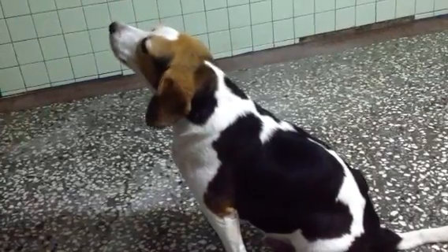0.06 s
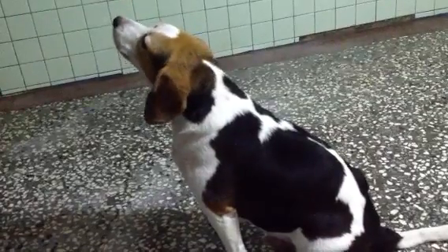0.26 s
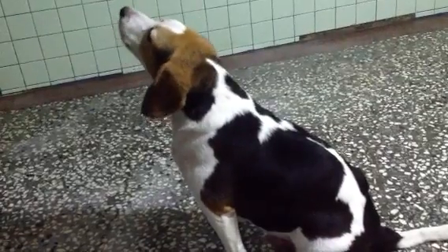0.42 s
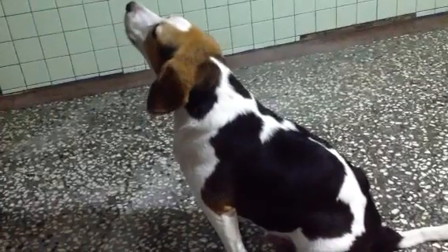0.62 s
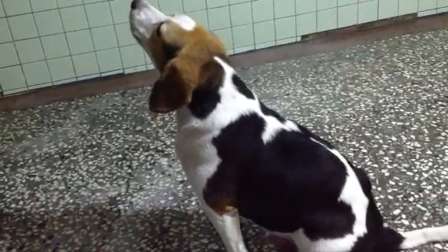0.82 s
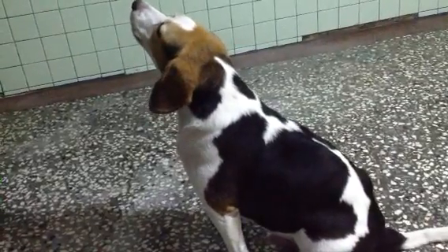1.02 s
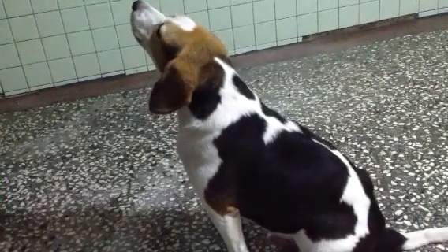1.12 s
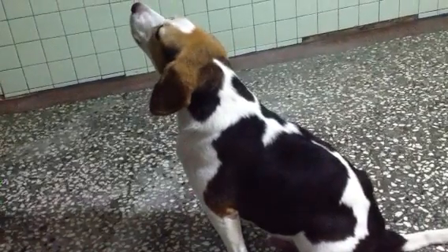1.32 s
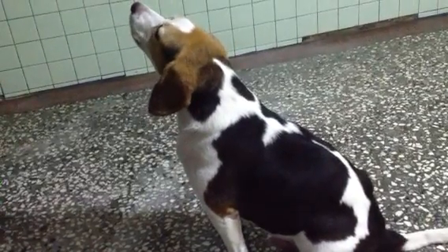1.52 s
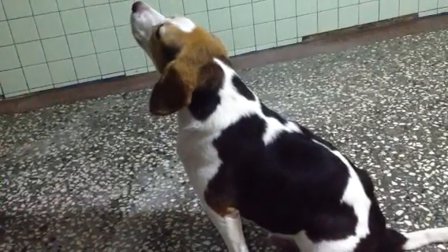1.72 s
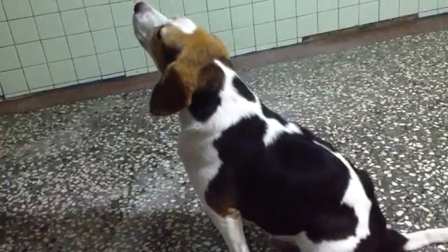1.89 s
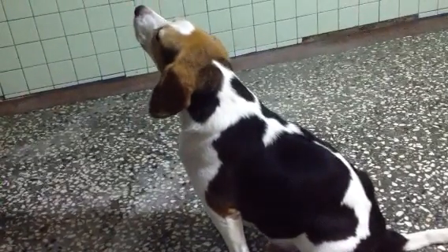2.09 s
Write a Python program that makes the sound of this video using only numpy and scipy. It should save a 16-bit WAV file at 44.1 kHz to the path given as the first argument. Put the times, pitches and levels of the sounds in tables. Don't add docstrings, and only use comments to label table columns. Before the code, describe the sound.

Dog howling one drawn-out note indoors, swelling early, then falling slowly and stopping with faint echo

```python
import sys
import numpy as np
from scipy import signal
from scipy.fft import rfft, irfft, next_fast_len
from scipy.io import wavfile
from scipy.ndimage import uniform_filter1d

SR = 44100
rng = np.random.default_rng(int(sys.argv[2]) if len(sys.argv) > 2 else 0)


def voltage_ratio(decibels):
    exponent = np.asarray(decibels, float) / 20
    return 10 ** exponent


def dump_mix(stems):
    frames = np.atleast_2d(stems).T
    limited = np.clip(frames, -1, 1)
    pcm = np.round(limited * 32767).astype(np.int16)
    wavfile.write(sys.argv[1], SR, pcm)


N = 94815
LEAD = 16384
TOTAL = N + LEAD


def set_level(x, db):
    return x * voltage_ratio(db) / np.sqrt(np.mean(x ** 2))


def drift(rate_hz):
    hold = int(SR / rate_hz)
    steps = np.repeat(rng.standard_normal(TOTAL // hold + 1), hold)
    return 1.3 * uniform_filter1d(uniform_filter1d(steps, hold), hold)[:TOTAL]


def peak(f, hz, width_hz):
    return 1 / (1 + ((f - hz ** 2 / f) / width_hz) ** 2)


def coloured(gain):
    n = next_fast_len(TOTAL)
    f = np.arange(1, n // 2 + 2) * SR / n
    return irfft(rfft(rng.standard_normal(n)) * gain(f), n)[:TOTAL]


def tract(f, resonances):
    return sum(voltage_ratio(db) * peak(f, hz, width_hz) for hz, width_hz, db in resonances)


def throat(f):
    # centre_hz, width_hz, level_db
    throat_modes = [(1020, 120, -6), (1200, 200, -16), (1490, 200, 0), (1700, 160, -1)]
    valley = 0.91 * peak(f, 2063, 216)
    return tract(f, throat_modes) * (1 - valley)


def howl(t):
    # time_s, pitch_hz, first_partial_db,
    # mouth_db (second partial over first), effort_db (bright part), throat_ring_db
    course = [(0, 376.3, -30, -6, -57, -47.5), (.12, 384.7, -31.5, -1.5, -62, -49.5),
              (.24, 376.2, -26.5, 4, -56, -34.5), (.31, 366.8, -24, -4, -53, -32.5),
              (.37, 375, -20, -2, -43.5, -20.5), (.45, 402.7, -17, 5, -38.5, -25.5),
              (.58, 408.6, -7.5, -24.5, -37.5, -25), (.67, 405.8, -15.5, -7, -44, -24.5),
              (.79, 400.6, -30, 12, -42, -27), (.86, 394.6, -15, -4.5, -46.5, -27),
              (.92, 385.6, -22, -2.5, -45, -35), (1.0, 365.8, -20.5, 7.5, -42, -29),
              (1.14, 360.6, -23.5, 19, -49, -31.5), (1.34, 360.2, -24.5, 11.5, -50, -33),
              (1.46, 350.7, -31.5, 8, -53, -29), (1.6, 337.6, -39.5, 21, -51.5, -36),
              (1.8, 336.5, -32, 15.5, -51.5, -30.5), (1.86, 335.7, -32.5, 9.5, -64, -49)]
    # centre_hz, width_hz, level_db
    teeth_modes = [(6430, 580, -9.5), (8677, 980, 3), (9750, 230, -15.5), (12000, 1100, -5),
                   (14600, 1200, -20)]
    # centre_hz, width_hz, level_db
    palate_modes = [(2580, 170, -19.5), (3238, 140, -13.5), (3730, 91, -18.5)]
    end_s, release_s, end_rise_hz, end_rise_s = 1.855, 0.011, 33.78, 0.0197
    lines_low_hz, lines_top_hz = 5600, 10500

    time_s, *columns = np.array(course).T
    curves = [uniform_filter1d(np.interp(t, time_s, column), size=600) for column in columns]
    pitch, first_db, mouth_db, effort_db, ring_db = curves

    glide = uniform_filter1d(np.abs(np.gradient(pitch)) * SR, size=4000)
    flutter_db = 1.5 + 0.012 * glide
    end_rise = end_rise_hz * np.exp(np.minimum(t - end_s, 0) / end_rise_s)
    pitch = pitch * (1 + 0.0015 * drift(34.94)) + end_rise
    phase = 2 * np.pi * np.cumsum(pitch) / SR

    first = voltage_ratio(flutter_db * drift(39.95)) * np.sin(phase)
    second = voltage_ratio(mouth_db + flutter_db * drift(45.08)) * np.sin(2 * phase + 1)
    voice = np.sqrt(2) * voltage_ratio(first_db) * (first + second)

    bright, ring = voltage_ratio(effort_db), voltage_ratio(ring_db)
    palate = voltage_ratio(0.83 * effort_db - 9.5)
    for k in range(3, 42):
        f = k * pitch
        lines_fade = 1 + (lines_low_hz / f) ** 16 + (f / lines_top_hz) ** 10
        gain = ring * throat(f) + palate * tract(f, palate_modes)
        gain = gain + bright * voltage_ratio(-7) * tract(f, teeth_modes) / lines_fade
        shimmer = voltage_ratio(5 * min(k / 6, 1) * drift(16))
        voice = voice + gain * shimmer * np.sin(k * phase + k * k)

    teeth_hiss = set_level(coloured(lambda f: tract(f, teeth_modes)), -2.5)
    throat_breath = set_level(coloured(lambda f: throat(f) + 0.5 * peak(f, 630, 500)), -23)
    palate_breath = set_level(coloured(lambda f: peak(f, 3100, 550) + peak(f, 3500, 700)), -21)
    puff = 1 + 0.1 * np.cos(phase)
    air = puff * (bright * (teeth_hiss + palate_breath) + ring * throat_breath)
    return (voice + air) * np.exp(-np.maximum(t - end_s, 0) / release_s)


def tiles(x):
    # centre_hz, t60_s
    fading = [(200, 0.64), (700, 0.23), (1700, 1), (6000, 0.15), (14000, 0.083)]
    first_echo_s, echo_db = 0.009, -8
    fade_hz, fade_s = np.array(fading).T
    t = np.arange(len(x)) / SR
    tail = 0
    for hz in 125 * 2. ** np.arange(8):
        t60 = np.interp(np.log(hz), np.log(fade_hz), fade_s)
        octave = coloured(lambda f: np.cos(np.pi / 2 * np.clip(np.log2(f / hz), -1, 1)))
        tail = tail + octave * voltage_ratio(-60 * t / t60) / np.sqrt(t60)
    tail = tail * (t > first_echo_s)
    tail = tail * voltage_ratio(echo_db) / np.sqrt(np.sum(tail ** 2))
    return signal.fftconvolve(x, tail)[:len(x)]


def hush():
    # frequency_hz, density_db (per Hz)
    room_tone = [(29, -57), (70, -35.5), (160, -7.5), (300, -6), (700, -1.5), (1800, -20.5), (4900, -30.5),
                 (9000, -20), (15000, -29)]
    hz, db = np.array(room_tone).T
    noise = coloured(lambda f: voltage_ratio(np.interp(np.log(f), np.log(hz), db)))
    return set_level(noise, -48.5) * voltage_ratio(1.5 * drift(6))


def low_bumps(t):
    # time_s, level_db
    bumps = [
        (.555, -60),
        (.59, -53),
        (1.056, -46),
        (1.147, -57),
    ]
    width_s = 0.003
    return sum(voltage_ratio(db) * np.exp(-((t - time_s) / width_s) ** 2) for time_s, db in bumps)


def inhale(t):
    start_s, rise_s = 1.93, 0.08
    air = set_level(coloured(lambda f: peak(f, 2200, 1800)), -59)
    return air * np.clip((t - start_s) / rise_s, 0, 1) * voltage_ratio(2 * drift(20))


def scene():
    t = (np.arange(TOTAL) - LEAD) / SR
    dog = howl(t)
    low_cut = signal.butter(3, 110, "high", fs=SR, output="sos")
    near = signal.sosfilt(low_cut, dog + tiles(dog) + inhale(t))
    return (near + hush() + low_bumps(t))[None, LEAD:]


def top_cut(x):
    return signal.sosfilt(signal.butter(12, 15520, fs=SR, output="sos"), x)


def record(dry):
    return top_cut(dry)


dry = scene()
out = record(dry)
dump_mix(out)
```